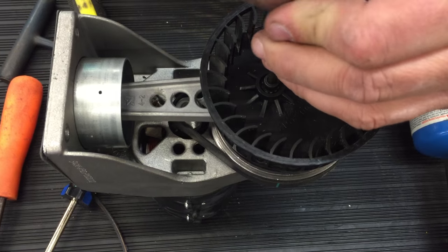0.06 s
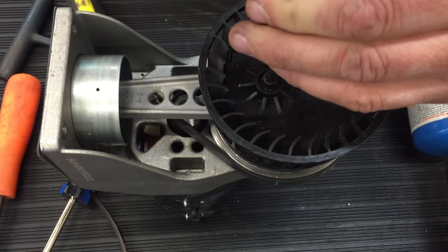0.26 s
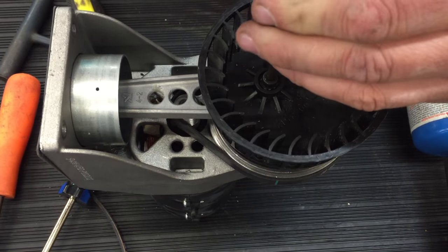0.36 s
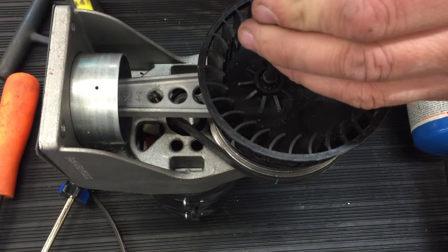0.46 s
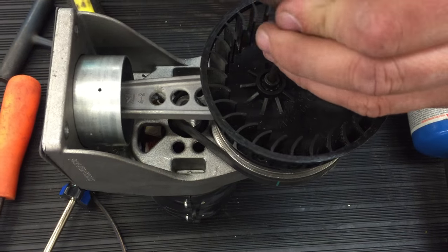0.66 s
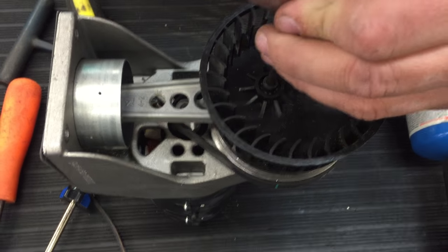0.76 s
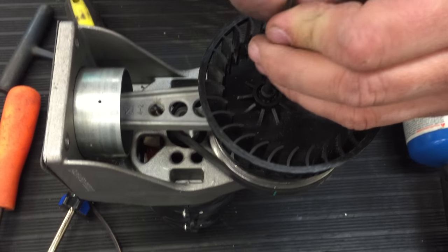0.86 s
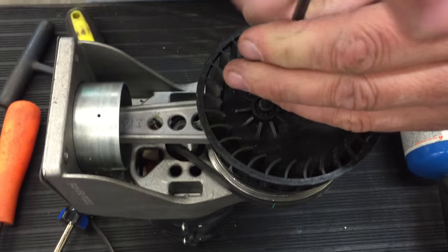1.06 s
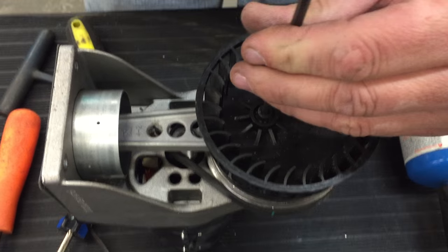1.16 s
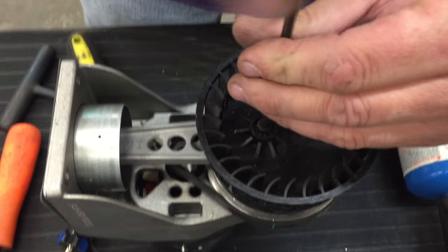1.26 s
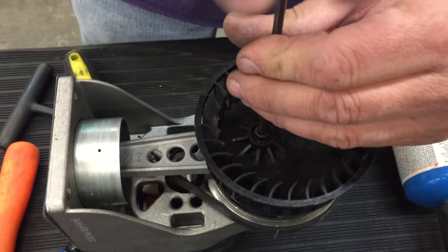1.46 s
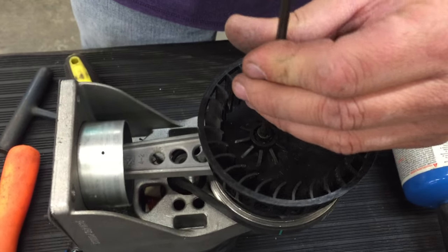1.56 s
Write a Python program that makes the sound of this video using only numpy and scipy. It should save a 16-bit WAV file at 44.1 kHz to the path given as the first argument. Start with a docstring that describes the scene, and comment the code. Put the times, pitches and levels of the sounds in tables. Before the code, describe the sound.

A metal pulley squeaks three times as a hand turns it, with soft bumps.

```python
"""Squeaky pulley on a workbench

Close up, a hand turns a pulley wheel in four short pushes, each starting with a soft bump.
On the first three the dry bearing sticks and slips in a gritty squeak near 2.9 kHz.
Play in the axle ticks and rings the frame, fingers brush the wheel, and mains hum fills the small room."""
import sys
import numpy as np
from scipy import signal
from scipy.fft import rfft, irfft
from scipy.io import wavfile
from scipy.ndimage import uniform_filter1d

SR = 44100
rng = np.random.default_rng(int(sys.argv[2]) if len(sys.argv) > 2 else 0)


def int16_out(signal):
    """Quantize to a 16-bit WAV file."""
    q = np.round(np.clip(np.atleast_2d(signal).T, -1, 1) * 32767)
    wavfile.write(sys.argv[1], SR, q.astype(np.int16))


N = 70560
TIME = np.arange(N) / SR

# one contour per squeak, its upper overtones taken before the metal colours them:
# (time [s], pitch [Hz], fundamental [dB], octave [dB], upper overtones [dB], friction hiss [dB])
SQUEAK_CONTOURS = [
    [(0.193, 2811, -64, -75, -75, -66), (0.202, 2844, -37, -48, -56, -54),
     (0.209, 2901, -39, -47, -49, -60), (0.218, 2936, -33, -46, -48, -57),
     (0.227, 2946, -29, -36, -43, -53), (0.238, 2964, -25, -34, -57, -59),
     (0.241, 2948, -26, -38, -65, -61), (0.245, 2885, -31, -57, -54, -63),
     (0.248, 2772, -31, -51, -53, -62), (0.25, 2709, -29, -55, -53, -62), (0.254, 2553, -31, -59, -68, -61),
     (0.257, 2487, -45, -57, -70, -66)],
    [(0.572, 2699, -65, -77, -81, -73), (0.594, 2793, -38, -61, -70, -65),
     (0.599, 2838, -38, -43, -55, -60), (0.611, 2896, -28, -50, -42, -57),
     (0.615, 2920, -32, -41, -42, -58), (0.622, 2919, -49, -39, -45, -61), (0.63, 2924, -35, -41, -52, -60),
     (0.637, 2934, -33, -43, -49, -64), (0.642, 2928, -37, -56, -51, -67),
     (0.646, 2864, -36, -45, -57, -67), (0.655, 2825, -40, -56, -56, -68),
     (0.663, 2840, -38, -47, -59, -67), (0.672, 2769, -46, -44, -64, -65),
     (0.682, 2784, -57, -72, -78, -74)],
    [(0.972, 2813, -61, -75, -74, -66), (0.979, 2828, -38, -36, -54, -61),
     (0.982, 2820, -34, -34, -45, -60), (0.989, 2775, -32, -42, -47, -56),
     (0.994, 2789, -33, -43, -46, -61), (1.005, 2883, -31, -36, -45, -63),
     (1.021, 2894, -32, -36, -47, -64), (1.03, 2887, -37, -50, -57, -66), (1.036, 2925, -48, -54, -60, -67),
     (1.04, 2842, -33, -46, -59, -66), (1.046, 2796, -32, -55, -51, -66), (1.051, 2724, -36, -52, -55, -70),
     (1.054, 2653, -35, -63, -71, -72), (1.057, 2457, -52, -66, -76, -73)],
]
# the metal passes upper overtones best near its resonances: (frequency [Hz], gain [dB])
METAL_RESPONSE = [(7400, 5), (8250, -3), (8750, -2), (9900, -18), (11150, -3.5), (11800, -8), (13200, -32),
                  (14100, -20), (14700, -17), (17000, -28)]
# colour of the friction hiss: (frequency [Hz], relative density [dB])
FRICTION_COLOUR = [(2200, -7.5), (3300, -8), (4500, -6.5), (7000, -11.5), (9700, -2), (13000, 0.5),
                   (17000, 0.5)]
# the bearing grinding under load: (centre [s], half length [s], level [dB])
GRIND_SWELLS = [(0.212, 0.0048, -77), (0.596, 0.015, -54.5), (0.636, 0.03, -57.5), (1.011, 0.02, -52),
                (1.045, 0.0081, -43), (1.35, 0.011, -56)]
# colour of the grinding: (frequency [Hz], relative density [dB])
GRIND_COLOUR = [(1500, -26.5), (2300, -10), (2900, 0.5), (3350, -2), (3900, -18), (4700, -26),
                (6500, -24.5), (9000, -27), (16000, -62)]
# faint bearing notes between pushes: (centre [s], half length [s], pitch [Hz], level [dB])
WHISPER_NOTES = [(0.257, 0.0024, 2240, -45.5), (0.281, 0.0024, 2800, -51), (0.283, 0.0034, 2340, -59),
                 (0.373, 0.0038, 3387, -58.5), (0.781, 0.015, 2900, -65), (1.53, 0.069, 2175, -75)]
# the hand bumping the frame: (time [s], peak level [dB], half width [s])
HAND_BUMPS = [(.097, -46.5, 0.0025), (0.171, -43, 0.0024), (0.273, -49.5, 0.0039), (0.56, -37, 0.0021),
              (0.703, -48, 0.0027), (0.836, -51.5, 0.0024), (.937, -29.5, 0.0015), (0.95, -36.5, 0.0025),
              (0.993, -49, 0.0037), (1.162, -55.5, 0.0025), (1.298, -47, 0.0016), (1.333, -31, 0.0019),
              (1.46, -54, 0.0028)]
# ticks of play in the axle: (time [s], level [dB], grit decay [s], low edge [Hz], high edge [Hz])
AXLE_TICKS = [(.5568, -43, 0.00067, 1400, 7900), (.6995, -53.5, 0.0022, 1540, 2000),
              (.9352, -53.5, 0.009, 1330, 7050), (1.062, -38, 0.0038, 406, 5940),
              (1.3304, -46.5, 0.0023, 1320, 5900)]
# ringing modes of wheel and frame: (frequency [Hz], relative level [dB], T60 [s])
FRAME_MODES = [(625, -12, .025), (1060, -16, 0.042), (1340, -20, 0.014), (1665, -6, 0.013),
               (1907, -6, .018), (2260, -4, 0.027), (2570, -3, 0.0097), (2870, -5, 0.02),
               (3360, -2.5, 0.02), (4165, -12.5, 0.016), (5770, -13, .012), (8360, -12, 0.013)]
# fingers sliding on the wheel: (centre [s], half length [s], level [dB], low-pass cutoff [Hz])
FINGER_STROKES = [(0.159, 0.012, -63.5, 13800), (0.221, 0.026, -58.5, 16000), (0.556, 0.009, -61, 9800),
                  (0.676, 0.022, -68, 7900), (0.934, 0.0057, -61, 14000), (0.965, 0.0045, -57, 13400),
                  (1.2, 0.0043, -66, 6000), (1.347, 0.029, -63, 3700), (1.374, 0.0028, -66, 11900),
                  (1.467, 0.012, -61, 16500)]
# colour of skin on the wheel: (frequency [Hz], relative density [dB])
SKIN_COLOUR = [(1200, -3.5), (3000, 9), (5000, -1.5), (8000, 1), (13000, 6.5), (17000, 7.5)]
# colour of the handling rumble: (frequency [Hz], relative density [dB])
RUMBLE_COLOUR = [(25, -12), (45, -0.5), (70, 7), (110, 4.5), (170, -10), (280, -15), (500, -40.5)]
# partials of the mains hum: (frequency [Hz], rms level [dB])
HUM_PARTIALS = [(120.3, -64.5), (240, -71.5), (360, -68), (600, -65.5), (840, -80), (960, -81.5)]
# colour of the room air: (frequency [Hz], relative density [dB])
AIR_COLOUR = [(150, 5), (240, 5.5), (330, -3.5), (480, -5.5), (800, -8.5), (1400, -13), (2500, -11.5),
              (4500, -19.5), (6600, -17), (8000, -22.5), (12000, -24.5), (17000, -21.5)]


def squeaks(jitter_share=0.0039, jitter_hz=290, flicker_hz=90, skirt_hz=290, edge_s=0.0013):
    """Stick-slip in the bearing: a jittery harmonic tone that arches, then sags as the wheel stops."""
    out, hiss = np.zeros(N), noise(FRICTION_COLOUR)
    jitter = jitter_share * drift(jitter_hz)
    shimmer = from_db(0.92 * drift(flicker_hz))
    # harmonics 3 to 5 each flicker in level and phase
    flicker = {k: from_db(3 * drift(flicker_hz)) * np.exp(0.16j * drift(jitter_hz)) for k in (3, 4, 5)}
    # uneven slipping spreads a skirt of noise around each partial
    skirt = 1 + from_db(-33) * (drift(skirt_hz) + 1j * drift(skirt_hz)) / np.sqrt(2)
    for contour in SQUEAK_CONTOURS:
        times, *columns = np.transpose(contour)
        hz, base_db, octave_db, upper_db, hiss_db = [np.interp(TIME, times, c) for c in columns]
        gate = np.clip(np.minimum(TIME - times[0], times[-1] - TIME) / edge_s + 1, 0, 1)
        phase = 2 * np.pi * np.cumsum(hz * (1 + jitter)) / SR
        gains = [from_db(base_db - 0.1), from_db(octave_db)]
        for k, flutter in flicker.items():
            metal_db = np.interp(k * hz, *np.transpose(METAL_RESPONSE))
            gains.append(from_db(upper_db + metal_db) * flutter)
        tone = sum(gain * np.exp(1j * k * phase) for k, gain in enumerate(gains, 1))
        out += gate * (np.sqrt(2) * shimmer * (tone * skirt).imag + from_db(hiss_db) * hiss)
    return out


def grinds():
    """Rough metal slides under load: swells of noise, strongest near the wheel's main resonance."""
    return noise(GRIND_COLOUR) * sum(from_db(db) * swell(at, half) for at, half, db in GRIND_SWELLS)


def whispers(jitter_share=0.0167, jitter_hz=290):
    """The barely moving bearing sings weak, unsteady notes."""
    out = np.zeros(N)
    wobble = 1 + jitter_share * drift(jitter_hz)
    for at, half, hz, db in WHISPER_NOTES:
        phase = 2 * np.pi * np.cumsum(hz * wobble) / SR
        out += from_db(db) * swell(at, half) * np.sqrt(2) * np.sin(phase)
    return out


def bumps(bench_db=-13):
    """Each soft bump of the hand moves the frame once, and the bench booms briefly."""
    push = sum(from_db(db) * (1 - ((TIME - at) / half) ** 2) * swell(at, half)
               for at, db, half in HAND_BUMPS)
    boom = unit_rms(ring(push, hz=112, t60=0.27))
    return push + from_db(bench_db) * np.std(push) * boom


def ticks(grit_db=-0.5, grit_rise_s=0.00039, crack_db=-18):
    """The loose axle clicks inside a short burst of grit and sets part of the frame's modes ringing."""
    out = np.zeros(N)
    for at, db, decay_s, low_hz, high_hz in AXLE_TICKS:
        envelope = np.exp(-np.maximum((TIME - at) / decay_s, (at - TIME) / grit_rise_s))
        grit = rng.standard_normal(N) * envelope
        force = from_db(grit_db) * grit / np.linalg.norm(grit)
        force[int(at * SR)] += 1   # the click
        body = sum(from_db(mode_db) * (-1) ** k * unit_rms(ring(force, hz, t60))
                   for k, (hz, mode_db, t60) in enumerate(FRAME_MODES))
        band = signal.butter(2, [low_hz, high_hz], "band", fs=SR, output="sos")
        tick = signal.sosfilt(band, unit_rms(body) + from_db(crack_db) * unit_rms(force))
        loudest_rms = np.sqrt(uniform_filter1d(tick ** 2, size=180).max())   # over 4 ms
        out += from_db(db) * tick / loudest_rms
    return out


def brushes():
    """Skin slides over the wheel in short hisses."""
    hiss = noise(SKIN_COLOUR)
    return sum(from_db(db) * swell(at, half) * unit_rms(lowpass(hiss, hz, order=1))
               for at, half, db, hz in FINGER_STROKES)


def handling_rumble(level_db=-62.5, swing_db=1):
    """The frame rumbles under the hand, low and slightly uneven."""
    return from_db(level_db + swing_db * drift(rate_hz=7.2)) * noise(RUMBLE_COLOUR)


def workshop_reverb(near, send_db=-21, t60=0.36, predelay_s=0.0069):
    """The small room answers with a weak, dull, diffuse tail."""
    tail = rng.standard_normal(N) * (TIME > predelay_s) * np.exp(-np.log(1000) * TIME / t60)
    wet = signal.fftconvolve(near, tail / np.linalg.norm(tail))[:N]
    return from_db(send_db) * lowpass(wet, hz=4370)


def room_tone(waver_db=1.68, air_db=-64.5):
    """Mains hum, each partial wavering slowly, over a soft bed of air."""
    hum = np.zeros(N)
    for hz, db in HUM_PARTIALS:
        gain = from_db(db + waver_db * drift(rate_hz=1.67))
        hum += gain * np.sqrt(2) * np.sin(2 * np.pi * (hz * TIME + rng.random()))
    return hum + from_db(air_db) * noise(AIR_COLOUR)


def from_db(db):
    """Decibels to gain."""
    return 10 ** (np.asarray(db) / 20)


def unit_rms(x):
    """Scale to an rms of 1."""
    return x / np.sqrt(np.mean(x ** 2) + 1e-20)


def lowpass(x, hz, order=2):
    """Gentle treble roll-off."""
    return signal.sosfilt(signal.butter(order, hz, fs=SR, output="sos"), x)


def drift(rate_hz):
    """Smooth random modulation, rms 1."""
    return unit_rms(lowpass(rng.standard_normal(2 * N), rate_hz)[N:])


def noise(colour):
    """Steady noise of the given colour, falling away below its lowest point; rms 1."""
    hz, db = np.transpose(colour)
    bin_hz = np.arange(N // 2 + 1) * SR / N + 1
    gain = from_db(np.interp(np.log(bin_hz), np.log(hz), db)) * np.minimum(bin_hz / hz[0], 1) ** 2
    return unit_rms(irfft(rfft(rng.standard_normal(N)) * gain, N))


def swell(centre, half):
    """Bell-shaped envelope."""
    return np.exp(-.5 * ((TIME - centre) / half) ** 2)


def ring(force, hz, t60):
    """One decaying mode, driven by a force."""
    radius, angle = np.exp(-np.log(1000) / (t60 * SR)), 2 * np.pi * hz / SR
    return signal.lfilter([0, np.sin(angle)], [1, -2 * radius * np.cos(angle), radius ** 2], force + 1e-18)


def scene():
    """Wheel and hand up front, the humming room behind; mono."""
    near = squeaks() + grinds() + whispers() + bumps() + ticks() + brushes()
    return (near + workshop_reverb(near) + room_tone() + handling_rumble())[None]


def record(dry):
    """The microphone drops the deepest bass; the top is cut steeply."""
    low_cut_hz, high_cut_hz = 39, 17200
    thinned = signal.sosfilt(signal.butter(2, low_cut_hz, "high", fs=SR, output="sos"), dry)
    return signal.sosfilt(signal.ellip(12, .1, 70, high_cut_hz, fs=SR, output="sos"), thinned)


dry = scene()
out = record(dry)
int16_out(out)
```